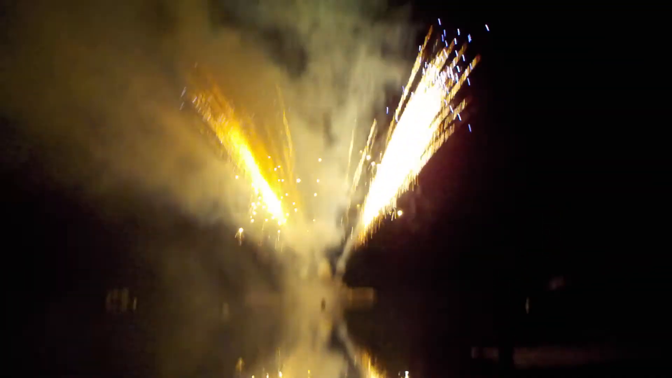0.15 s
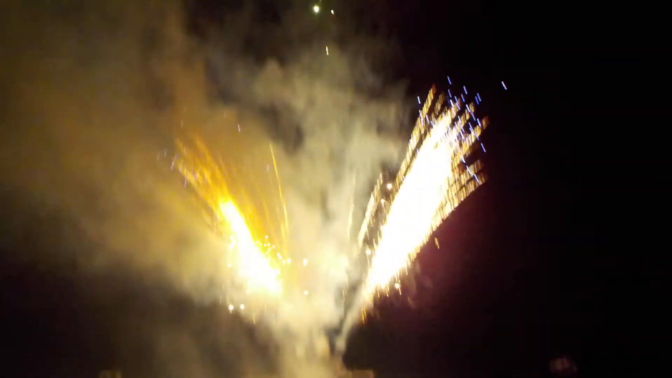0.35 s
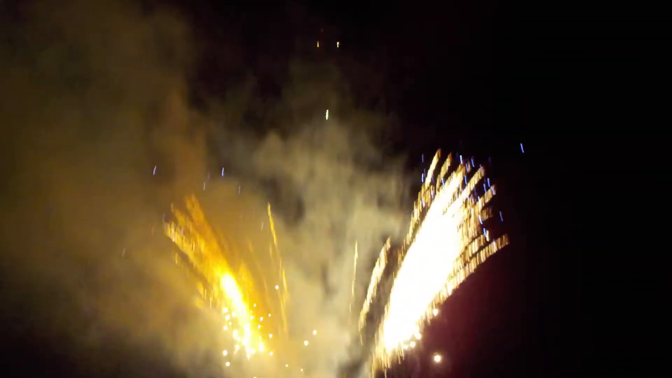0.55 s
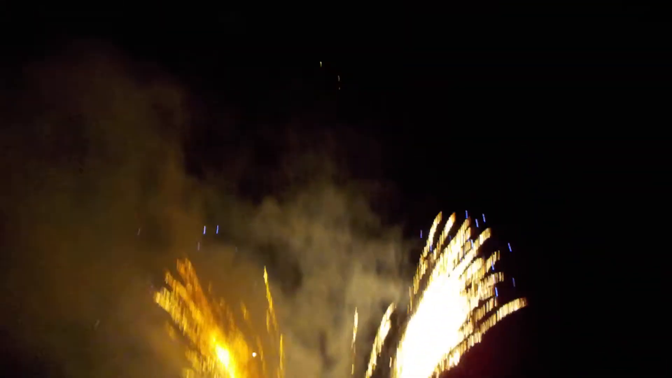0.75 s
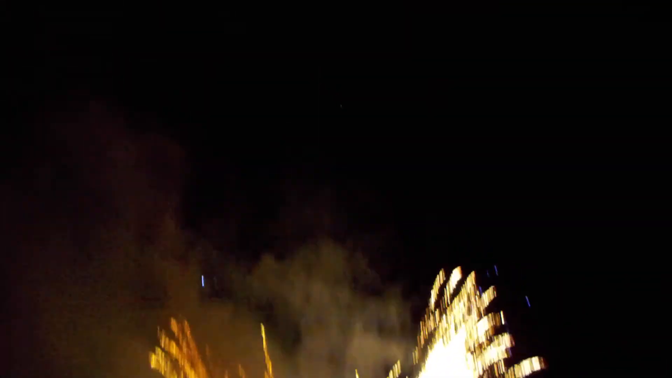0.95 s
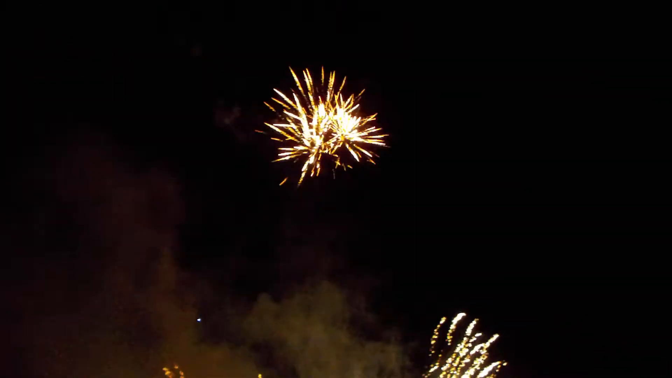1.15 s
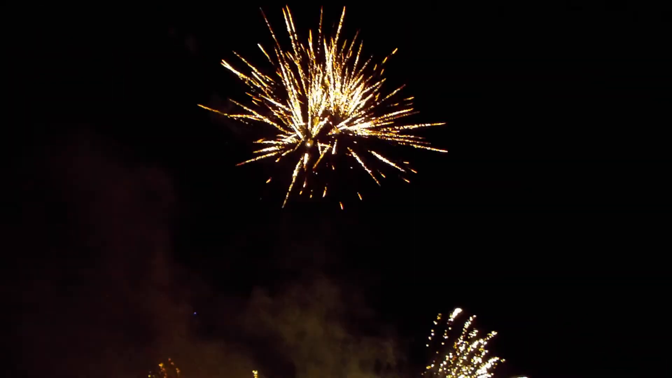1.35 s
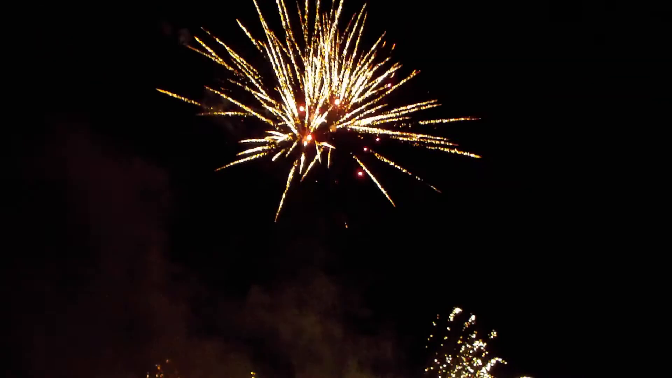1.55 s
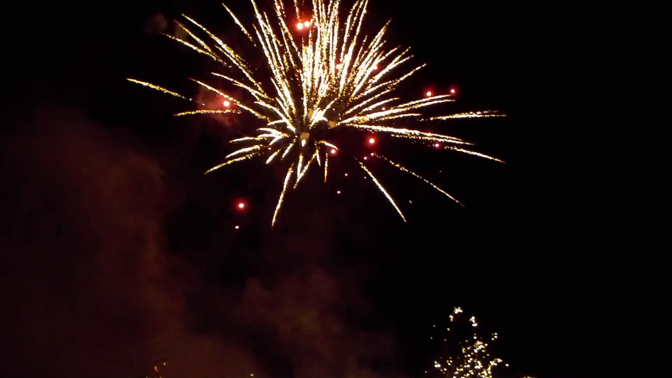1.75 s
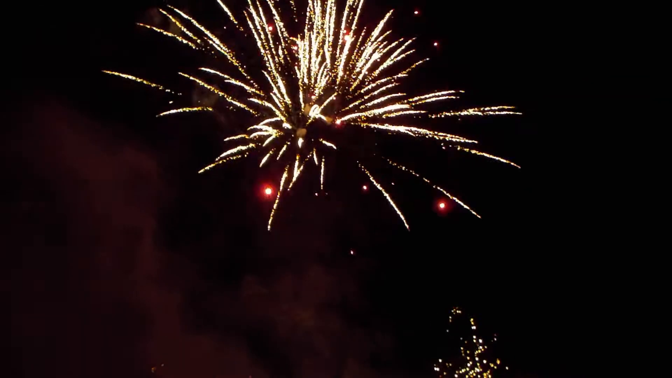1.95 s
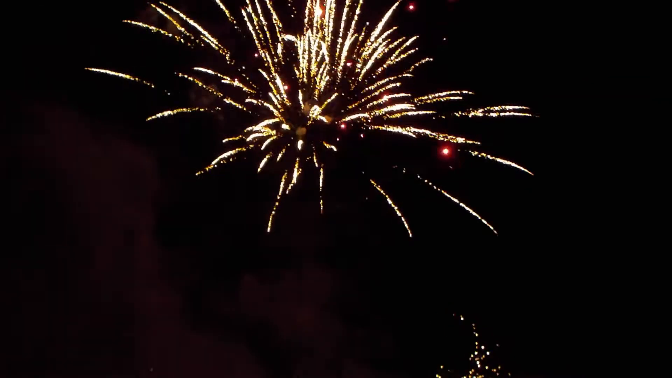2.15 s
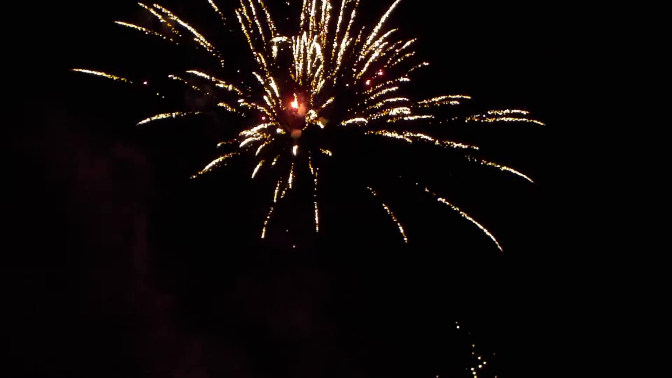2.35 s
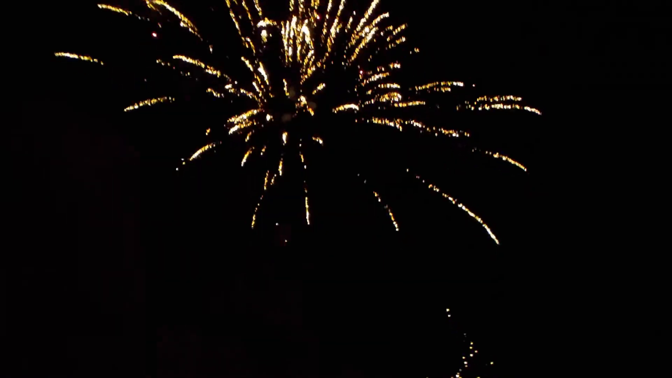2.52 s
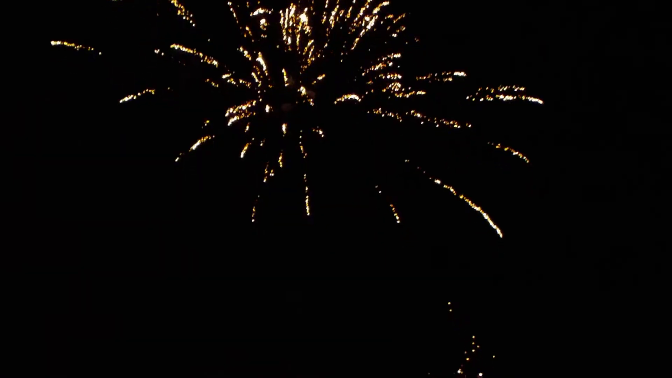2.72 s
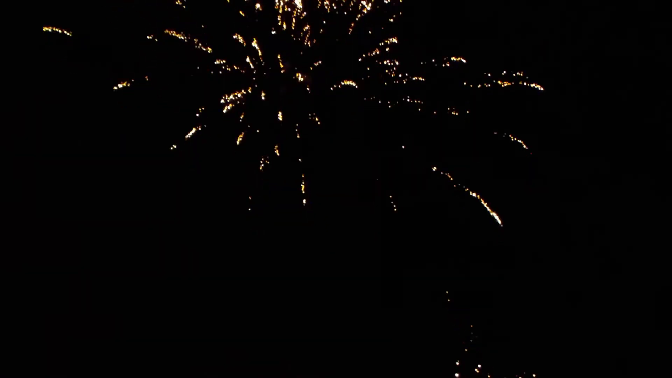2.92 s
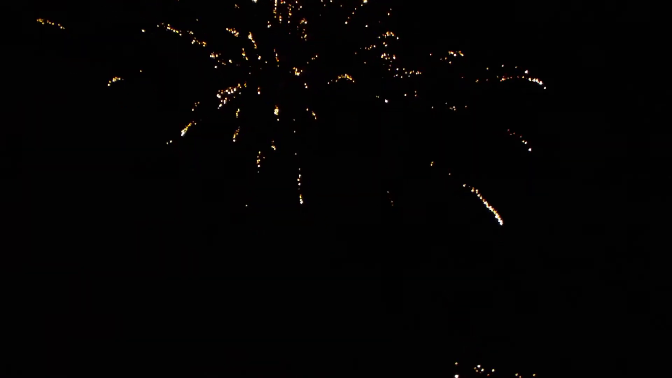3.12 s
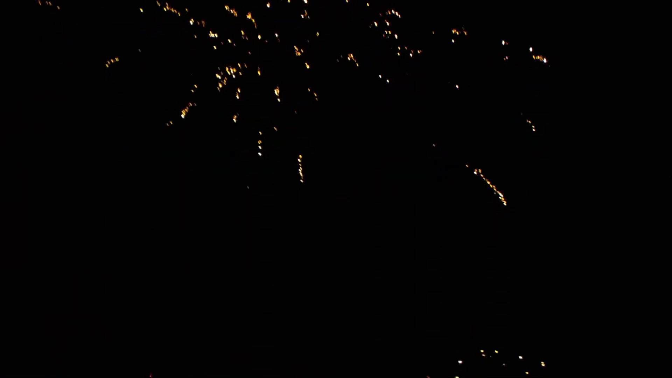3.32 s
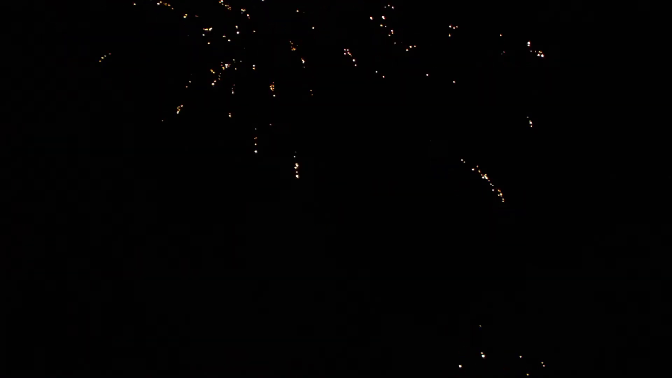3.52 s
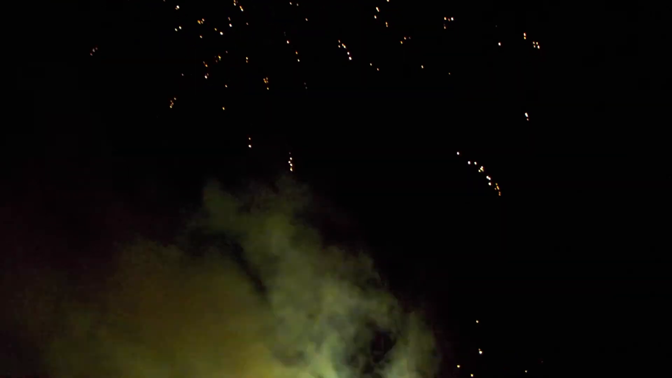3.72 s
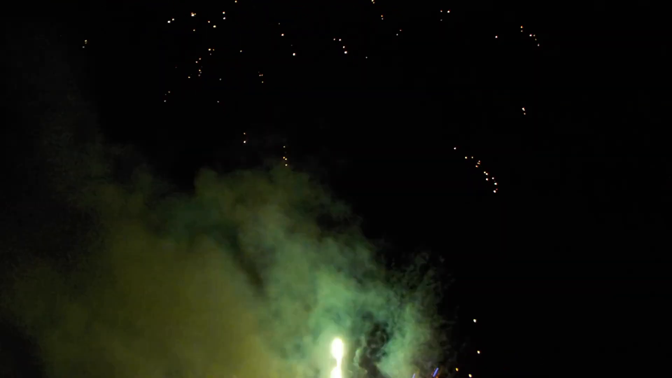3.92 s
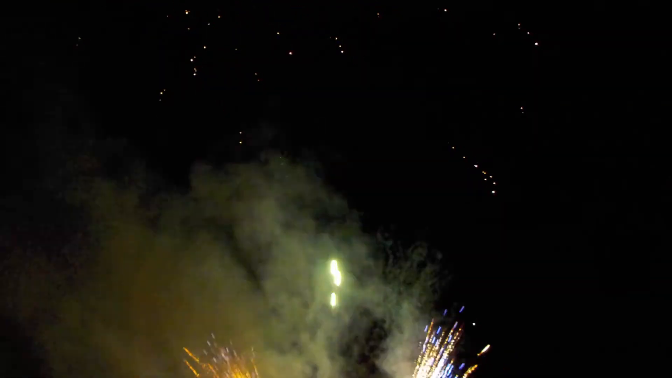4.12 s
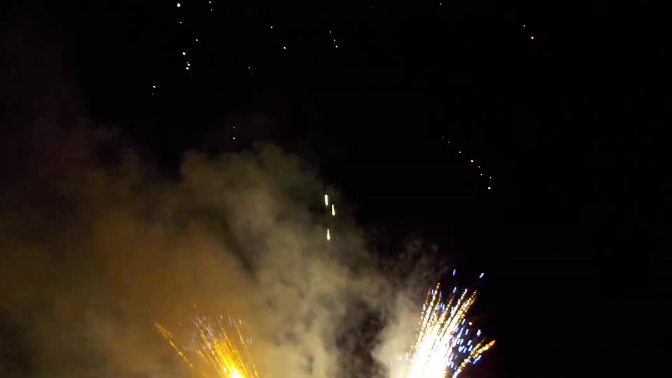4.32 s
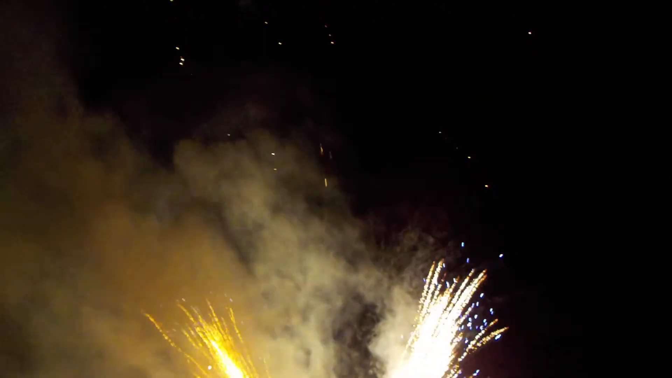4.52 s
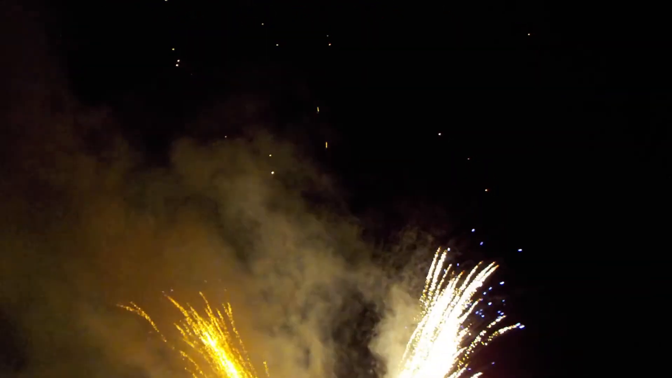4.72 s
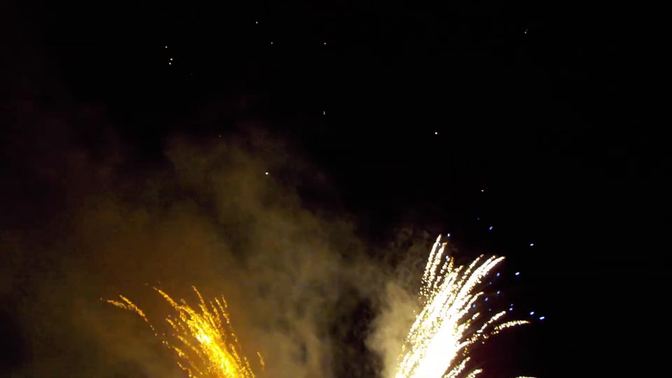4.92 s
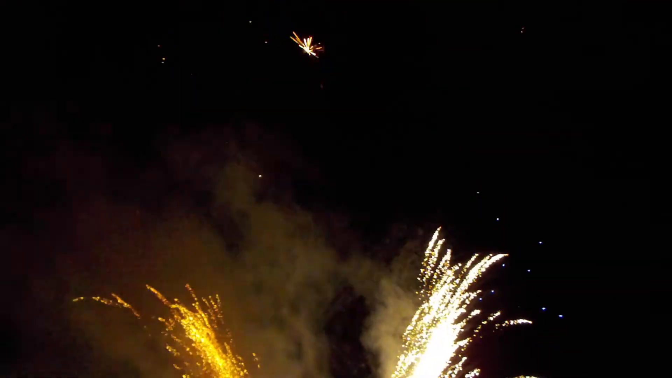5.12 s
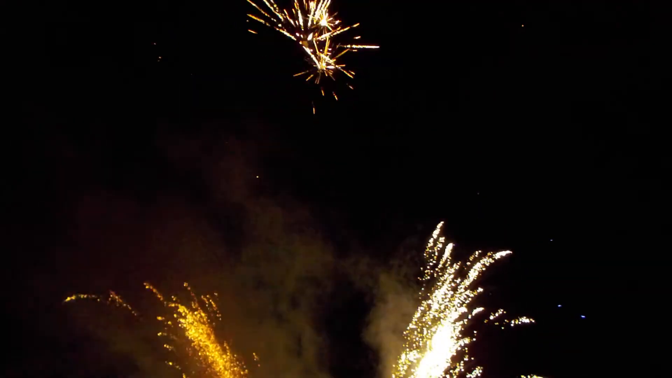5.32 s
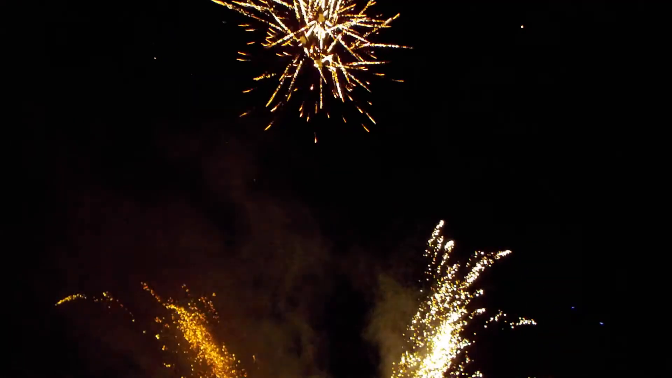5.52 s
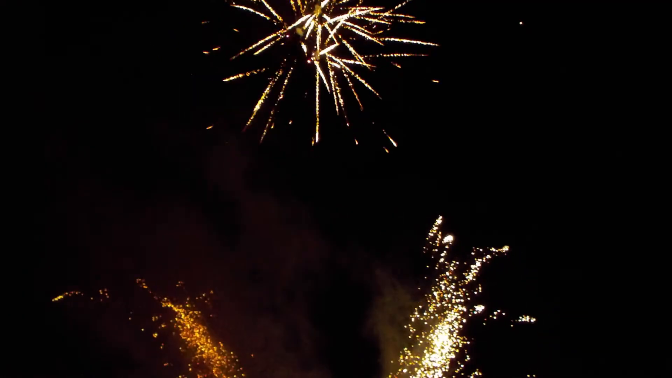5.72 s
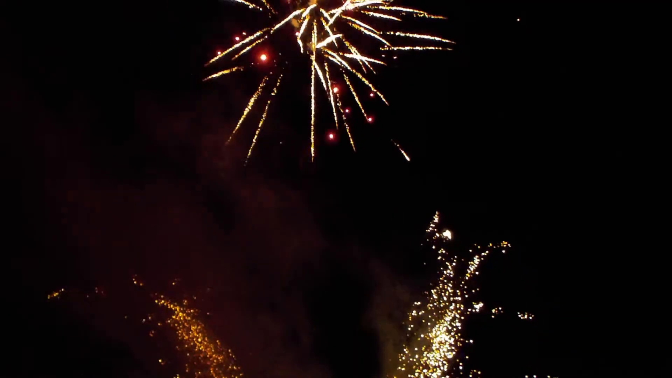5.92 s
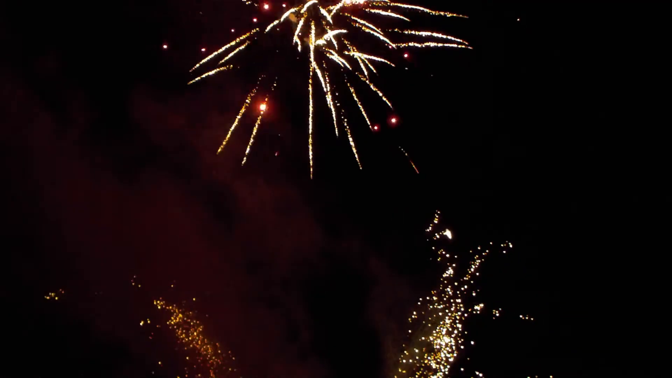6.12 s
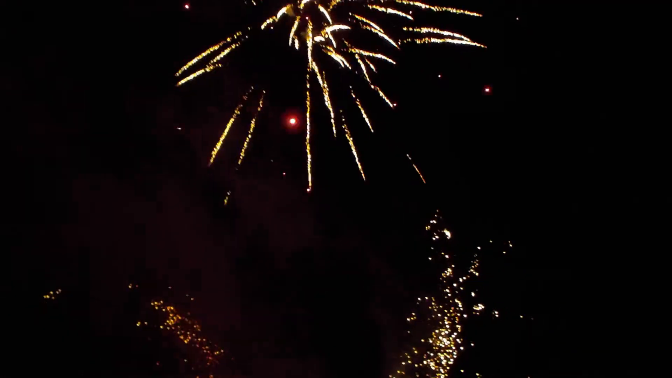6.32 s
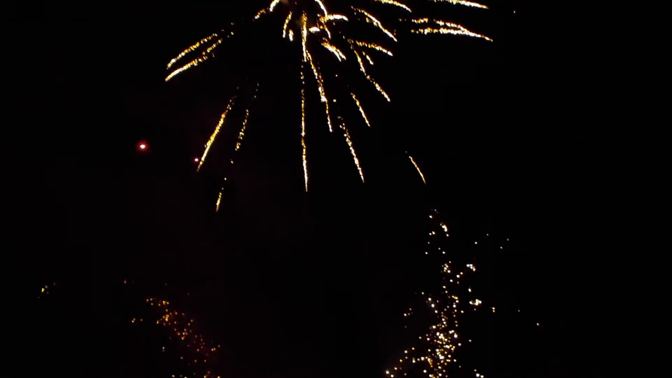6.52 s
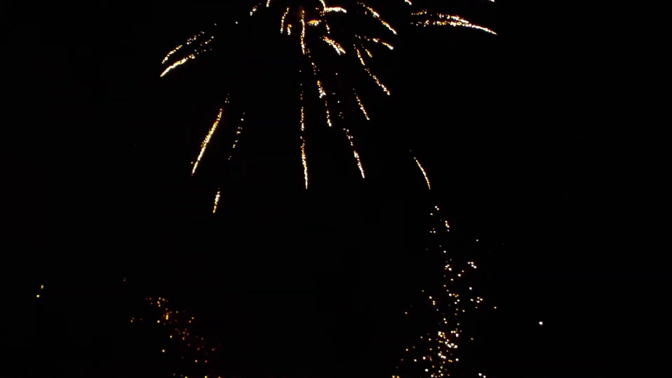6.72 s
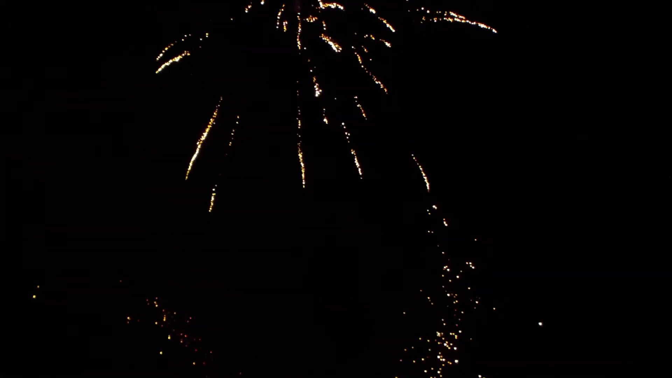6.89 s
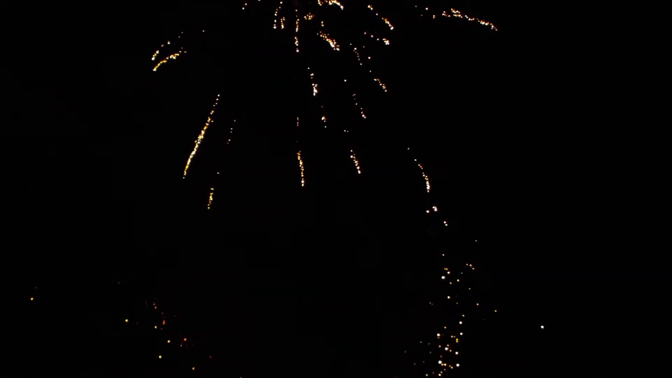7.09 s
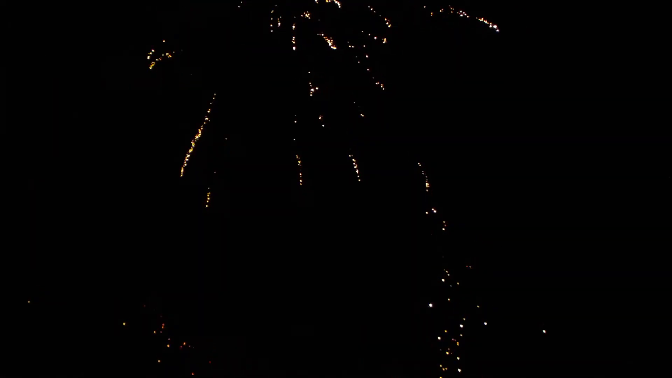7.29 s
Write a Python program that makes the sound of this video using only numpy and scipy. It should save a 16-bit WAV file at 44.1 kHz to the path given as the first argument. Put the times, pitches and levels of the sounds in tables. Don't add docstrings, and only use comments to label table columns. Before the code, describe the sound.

Night fireworks across a lake, heard by a small microphone that overloads softly. A fading echo and scattered small pops open the scene; by 0.25 s they thicken into a dense, hissing, frying crackle lasting until about 1 s. Larger stars snap and bangs hit at 1.07 and in a tight burst at 1.27-1.4 s, the crackle ducking beneath them. Echoes slap back from shore and trees at 1.5-1.75 s and roll away, with a lone crack at 2.15 s and a dull distant thud near 2.7 s. Near quiet follows. At 3.83 s blunt launch bangs thump with low ground rumble and quick echoes. Pops quicken from 4.1 s into a second full crackle, 4.4-5.2 s, breaking into heavy snaps. Hard bangs strike at 5.43 and 5.6 s, with sharp slaps until 6.25 s. The roll decays; muffled hill echoes thud around 6.75-7.25 s.

```python
import sys
import numpy as np
from scipy import signal
from scipy.fft import rfft, irfft
from scipy.io import wavfile
from scipy.ndimage import uniform_filter1d

SR = 44100
rng = np.random.default_rng(int(sys.argv[2]) if len(sys.argv) > 2 else 0)


def file_out(sig):
    cols = np.atleast_2d(sig).T
    lim = np.clip(cols, -1, 1)
    pcm = np.round(lim * 32767).astype(np.int16)
    wavfile.write(sys.argv[1], SR, pcm)


def volts_from_decibels(level):
    exponent = np.asarray(level, float) / 20
    return 10 ** exponent


N = 324135

# low edge f/Hz, high edge f/Hz
BANDS = [(150, 430), (430, 1300), (1300, 2450), (2450, 4900), (4900, 8000), (8000, 15000)]
SIDE_DB = [-19, -22, -17, -10, -7, -8]
# t/s, edge/dB, body/dB, boom/dB, gain control dip/dB (none if negative)
BANGS = [(1.073, -24, -11.5, -46, 13.5), (1.2744, -24.5, -16, -46, 7), (1.339, -42, -12, -10.5, 7),
         (1.3411, -19.5, -6, -15, -0.5), (1.3684, -34, -11, -10, 0.5), (1.373, -54, -8.5, -20, 2),
         (1.3952, -23.5, -10, -10, 8), (3.8328, -20.5, -4, -4.5, -4), (3.8445, -48, -11.5, -19, -6),
         (3.8489, -44, -17, -24, -5), (3.8512, -35, -4, -32, -7), (5.4251, -18.5, -4.5, -12, 3),
         (5.43, -50, -9.5, -6, -0.5), (5.5956, -12.5, -2, -4.5, 7.5), (5.6015, -49.5, -8, -22, 3),
         (5.623, -25, -8, -11, 5)]


def bangs(mic):
    s, edge, body, boom, _ = np.transpose(BANGS)
    crack = -17 + 0.43 * (edge + 20)
    levels = [boom, body, body - 8, crack, crack, edge]
    return blasts(mic, s, levels, step_db=1.5, mirror_db=-5.0, puff_db=-12.5)


def stars(mic):
    # t/s, edge/dB, crack/dB, body/dB
    early = [(.067, -48, -22, -19), (.084, -53, -21, -16.5), (.0948, -45, -22, -31), (.1263, -47, -20, -23),
             (.1576, -52, -20, -33), (.162, -49, -22, -17), (.185, -48.5, -24, -20), (.199, -48, -22, -24),
             (.207, -46, -14, -14), (.222, -49, -13.5, -12.5), (4.0871, -55, -27, -34),
             (4.1265, -56, -26, -38), (4.1338, -50, -24.5, -37), (4.161, -49, -27, -22),
             (4.171, -55, -31, -28), (4.1837, -53, -21.5, -16.5), (4.229, -55, -24, -28),
             (4.266, -50, -23, -24), (4.283, -51, -26, -23), (4.2444, -53, -22, -23),
             (4.253, -49, -18, -19), (4.298, -44, -22, -30)]
    # t/s, crack/dB
    kindling = [(4.298, -23), (4.3094, -20), (4.3168, -21), (4.329, -13.5), (4.3527, -14.5),
                (4.3763, -17.5), (4.3864, -14), (4.4241, -15)]
    # t/s, edge/dB, crack/dB, body/dB
    stragglers = [(1.05, -29, -14, -19), (1.0626, -31, -15, -5), (1.132, -51, -21, -14),
                  (1.1442, -51, -16, -8.5), (1.148, -24, -14.5, -37), (1.163, -39, -18, -9.5),
                  (1.174, -37, -16, -11), (1.18, -26, -19.5, -13), (1.189, -38, -16, -15),
                  (1.21, -26.5, -15.5, -9.5), (1.2394, -16.5, -14.5, -12.5), (1.254, -31, -19, -7.5),
                  (1.2669, -49, -9.5, -8), (1.27, -32, -15, -6.5), (1.312, -44, -15, -12.5),
                  (1.3358, -16, -14, -7), (5.2013, -27, -12, -3), (5.222, -29, -10, -15),
                  (5.2397, -32, -11.5, -3), (5.2659, -23, -12, -5), (5.2703, -28, -28.5, -14),
                  (5.282, -36, -16.5, -27), (5.3057, -27, -22, -8.5), (5.3142, -25, -14, -34),
                  (5.3265, -32, -18, -8.5), (5.345, -21.5, -14, -15), (5.35, -22.5, -16, -7.5),
                  (5.3808, -25.5, -13.5, -5.5), (5.387, -22, -19.5, -11), (5.409, -49, -16, -8)]
    # t/s, edge/dB, crack/dB, body/dB
    lone = [(1.0896, -59, -29, -20), (1.121, -59, -21, -21), (1.401, -55, -31, -11.5),
            (1.5496, -20, -13, -6), (1.6609, -14.5, -12, -6), (1.735, -44, -32, -7),
            (2.1588, -43, -13.5, -8.5), (2.6753, -70, -43, -31), (3.0927, -70, -35.5, -43),
            (3.8629, -43, -27, -15), (3.916, -59, -31, -21), (3.9365, -53, -17, -21),
            (3.951, -62, -35, -17), (4.4752, -19, -17, -7.5), (5.4156, -39, -22, -21),
            (5.4735, -70, -31, -35), (5.524, -32, -16, -9.5), (5.673, -71, -29, -27),
            (5.816, -68, -22, -9.5), (5.877, -28, -12.5, -9.5), (5.9048, -14, -13.5, -12.5),
            (6.1021, -24.5, -13.5, -8), (6.1685, -28, -15, -10.5), (6.245, -14.5, -15.5, -10.5)]
    # start t/s, end t/s
    igniting_s = [(0, .2), (4.05, 4.3)]
    small = scattered(igniting_s, [-55, -27.5, -25], scatter_db=3, count=8)
    catching = [(s, *np.add(crack_db, (-20, 3, 3.5))) for s, crack_db in kindling]
    s, edge, crack, body = np.vstack([early, catching, stragglers, lone, small]).T
    levels = [body - 32, body - 3, body, crack, crack, edge]
    return blasts(mic, s, levels, step_db=-7.5, mirror_db=-2.0, puff_db=-6.5)


def fan_sparks(mic):
    # t/s, edge/dB
    nearest = [(.239, -24.5), (.256, -30), (.2768, -21.5), (.2867, -32), (.3186, -26), (.3364, -36),
               (.356, -28), (.404, -26), (.4305, -28), (.4562, -27), (.594, -38), (.6165, -23),
               (.7353, -27.5), (.8302, -33), (.9879, -25), (4.356, -31), (4.3835, -22), (4.4034, -21),
               (4.4366, -24.5), (4.508, -27), (4.5387, -21), (4.6044, -23.5), (4.709, -31), (4.8372, -32),
               (4.8814, -23.5), (5.0218, -26), (5.1032, -28), (5.1137, -26), (5.1503, -29.5)]
    # start t/s, end t/s
    fan_s = [(.25, 1.03), (4.43, 5.18)]
    farther = scattered(fan_s, [-33], scatter_db=3, count=45)
    s, edge = np.vstack([nearest, farther]).T
    near = 0.37 * (edge + 30)
    levels = [near - 55, near - 22, near - 21, near - 21.5, near - 21.5, edge]
    return blasts(mic, s, levels, step_db=-1.0, mirror_db=-6.5, puff_db=-2.5)


def blasts(mic, s, levels, step_db, mirror_db, puff_db):
    pop_db = [3, -1, -4, -3, -0.5, 4]
    puff_s = [0.0046, 0.0038, 0.0043, 0.0018, 0.0032, 0.00048]
    at = (s * SR).astype(int)
    aside = np.sin(1000 * s)
    low = (s > 3.8) & (s < 3.9)
    detour = (np.where(low, 0.00131, 0.0017) * SR).astype(int)
    out = 0
    for edges, db, share_db, side_db, fade_s in zip(BANDS, levels, pop_db, SIDE_DB, puff_s):
        train = np.zeros((2, N))
        np.add.at(train, (0, at), volts_from_decibels(db + share_db))
        np.add.at(train, (1, at + 1), volts_from_decibels(db + share_db + side_db + 2.5) * aside)
        step = train.copy()
        step[:, at + detour] += volts_from_decibels(mirror_db - edges[0] / 600) * (train[:, at] + train[:, at + 1])
        mic_peak = np.abs(signal.hilbert(sharp_band(mic, edges))).max()
        step = sharp_band(step, edges) / mic_peak
        tail = signal.fftconvolve(train, decay(fade_s, count=2500)[None])[:, :N]
        puff = band(tail * noise(edges[0]), edges) / band_rss(mic, edges)
        mid, side = volts_from_decibels(step_db) * step + volts_from_decibels(puff_db) * puff
        out = out + stereo(mid, side)
    return out


def scattered(spans, levels_db, scatter_db, count):
    rows = []
    for start_s, end_s in spans:
        s = rng.uniform(start_s, end_s, count)
        rows.append(np.c_[s, rng.standard_normal((count, len(levels_db)))])
    rows = np.vstack(rows)
    return np.c_[rows[:, 0], np.add(levels_db, scatter_db * rows[:, 1:])]


def wash(mic):
    boom, body, hiss, air = layers()
    lean = 0.32 * (hiss - body + 6)
    thin = 0.11 * (hiss + 30)
    levels = [boom, body - 3 - lean, body - 3 + lean, hiss - 4 - thin, hiss - 2 + thin, air]
    far = puffs(count=1500, scatter_db=0.5, tail_s=0.0036)
    near = puffs(count=1800, scatter_db=8.0, tail_s=0.0008)
    sparks = np.clip((air + 64) / 8, 0, 1)
    shapes = [1 - share * (1 - far) for share in (0.23, 0.35, 0.25, 0.29, 0.23)]
    shapes.append(1 - np.clip(1.1 * sparks, 0, 0.9) * (1 - near))
    roll = walk(28)
    out = 0
    for edges, db, shape, side_db in zip(BANDS, levels, shapes, SIDE_DB):
        wander_db = 0.86 * roll + 1.83 * walk(12)
        gain = volts_from_decibels(db + wander_db) * np.sqrt(np.abs(shape)) / band_rss(mic, edges)
        mid, side = band(gain * noise(edges[0]), edges)
        out = out + stereo(mid, volts_from_decibels(side_db) * side)
    return out


def layers():
    # t/s, level/dB
    crackle = [
        [(0, -41), (.15, -40.5), (.26, -28), (.38, -27), (.78, -26), (1.0, -28), (1.18, -32.5), (1.32, -32.5),
         (1.41, -54)],
        [(4.0, -79.5), (4.2, -47), (4.29, -32), (4.47, -26), (4.64, -24.5), (5.09, -27.5), (5.26, -35.5),
         (5.42, -36.5), (5.46, -69)],
    ]
    crackle_colour_db = [-22.5, 4, 0, -25]
    # peak t/s, level/dB, boom against level/dB, fade/(dB/s)
    returns = [(-.12, -22.5, -21, 87), (1.51, -30.5, 5.5, 99), (1.57, -21.5, -16.5, 41),
               (1.748, -24, -11.5, 70), (1.95, -32.5, -9.5, 60), (2.72, -48, -3, 102), (3.8, -44.5, -4, 59),
               (3.943, -21.5, -9, 194), (4.015, -30, -14, 157), (5.51, -27, -5, 87), (5.57, -24, -16, 92),
               (5.735, -28, 0.5, 114), (5.78, -20.5, -12, 91), (5.87, -26, -17, 33),
               (5.97, -25.5, -11.5, 75)]
    night_db = [-62, -49.5, -70.5, -78.5]
    roll_db, roll_fade_db_per_s = np.c_[[-28, -13, -24, -57.5]], np.c_[[11.1, 15.5, 21, 24]]
    t = np.arange(N) / SR
    burning = 0
    for fan in crackle:
        fan_s, fan_db = np.transpose(fan)
        burning = burning + volts_from_decibels(np.interp(t, fan_s, fan_db, left=-np.inf, right=-np.inf)) ** 2
    piled = []
    for pile_up_s in (0.15, 0.067):
        hold = np.exp(-1 / (pile_up_s * SR))
        piled.append(signal.lfilter([1 - hold], [1, -hold], burning))
    power = volts_from_decibels(np.c_[crackle_colour_db]) ** 2 * [*piled, burning, burning]
    power = power + volts_from_decibels(np.c_[night_db]) ** 2
    for s, db, boom_db, fade_db_per_s in returns:
        late_s = np.maximum(t - s, 0)
        rise_db = db - 1.77 * fade_db_per_s * np.maximum(s - t, 0)
        hiss_db = -13 - 0.45 * (boom_db + 10)
        colour_db = np.c_[[boom_db, 0, hiss_db, -49]]
        power = power + volts_from_decibels(rise_db - fade_db_per_s * late_s + colour_db) ** 2
        power = power + volts_from_decibels(rise_db - roll_fade_db_per_s * late_s + roll_db) ** 2
    return 10 * np.log10(power)


def puffs(count, scatter_db, tail_s):
    moment, size = rng.random((count, 2)).T
    train = np.zeros(N)
    train[(moment * (N - 1)).astype(int)] = volts_from_decibels(scatter_db * np.minimum(-np.log(size), 2)) ** 2
    power = np.abs(signal.fftconvolve(train, decay(tail_s, count=2000))[:N])
    return np.minimum(power / power.mean(), 5)


def gain_control():
    s, _, _, _, dip_db = np.transpose(BANGS)
    dips = np.zeros(N)
    dips[(s * SR).astype(int)] = np.maximum(dip_db, 0)
    return volts_from_decibels(-signal.fftconvolve(dips, decay(0.074, count=12000))[:N])


def hills(mic):
    # t/s, level/dB
    far_echoes = [(2.698, -22.5), (3.015, -49), (6.753, -20.5), (6.8, -24), (6.943, -35), (6.973, -20),
                  (6.99, -23), (7.212, -32), (7.245, -40)]
    s, body = np.transpose(far_echoes)
    levels = [body - 18, body - 3, body - 8, body - 30, body - 35, body - 60]
    return blasts(mic, s, levels, step_db=-21, mirror_db=5, puff_db=-7.0)


def thuds(mic):
    # t/s, level/dB, fade t/s
    lifts = [
        (0.001, -62.5, .15),
        (3.831, -38, 0.056),
        (4.019, -49, 0.065),
    ]
    t = np.arange(N) / SR
    swell = sum(volts_from_decibels(db) * (t > s) * np.exp(-np.abs(t - s) / fade_s) for s, db, fade_s in lifts)
    edges = (70, 170)
    return band(swell * rng.standard_normal(N), edges) / band_rss(mic, edges)


def mic_response(size=2048):
    # f/Hz, level/dB
    mic_colour = [(35, -78), (110, -35), (305, -17.5), (720, -1), (1000, -3), (1250, -1), (1950, -6),
                  (3500, -12), (4800, -14), (5200, -3), (7100, -9.5), (8700, -20.5), (11600, -9.5),
                  (13500, -46.5)]
    # f/Hz, width f/Hz, level/dB
    port_notches = [(2403, 150, -26), (3010, 128, -14.5), (8010, 320, -27.5)]
    hz, db = np.transpose(mic_colour)
    axis = np.linspace(1, SR / 2, size + 1)
    colour = np.interp(np.log(axis), np.log(hz), db) - 40 * np.clip(axis / hz[-1] - 1, 0, 1)
    for notch_hz, width_hz, deep_db in port_notches:
        colour += deep_db * np.exp(-((axis - notch_hz) / width_hz) ** 2 / 2)
    cepstrum = irfft(np.log(volts_from_decibels(colour)))
    cepstrum[1:size] *= 2
    cepstrum[size + 1:] = 0
    return irfft(np.exp(rfft(cepstrum)))[:size]


def decay(seconds, count):
    return np.exp(-np.arange(count) / (seconds * SR))


def band(x, edges):
    return signal.sosfilt(signal.butter(4, edges, "bandpass", fs=SR, output="sos"), x)


def sharp_band(x, edges):
    return signal.sosfiltfilt(signal.butter(3, edges, "bandpass", fs=SR, output="sos"), x)


def band_rss(mic, edges):
    return np.sqrt(np.sum(band(mic, edges) ** 2))


def walk(rate_hz):
    hold = int(SR / rate_hz)
    steps = np.repeat(rng.standard_normal(N // hold + 1), hold)
    return 0.88 * uniform_filter1d(steps, hold)[:N]


def noise(shift):
    return np.roll(np.clip(rng.standard_normal((2, N)), -3, 3), shift, axis=1)


def stereo(mid, side):
    return np.array([0.82 * mid + side, 0.85 * mid - side])


def scene():
    mic = mic_response()
    pops = bangs(mic) + stars(mic) + fan_sparks(mic)
    return pops + gain_control() * wash(mic) + hills(mic) + thuds(mic)


def roll_off(x):
    return signal.sosfilt(signal.butter(12, 15800, fs=SR, output="sos"), x)


def record(dry):
    heard = signal.fftconvolve(dry, mic_response()[None])[:, :N]
    mix = np.tanh(0.84 * heard) * 1.219
    return roll_off(mix)


dry = scene()
out = record(dry)
file_out(out)
```